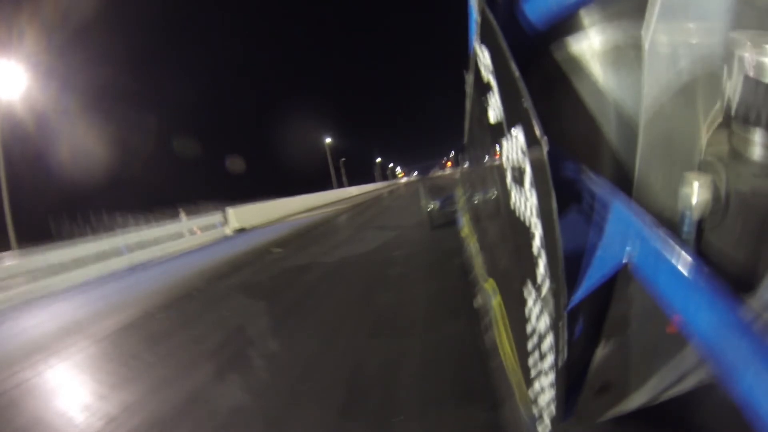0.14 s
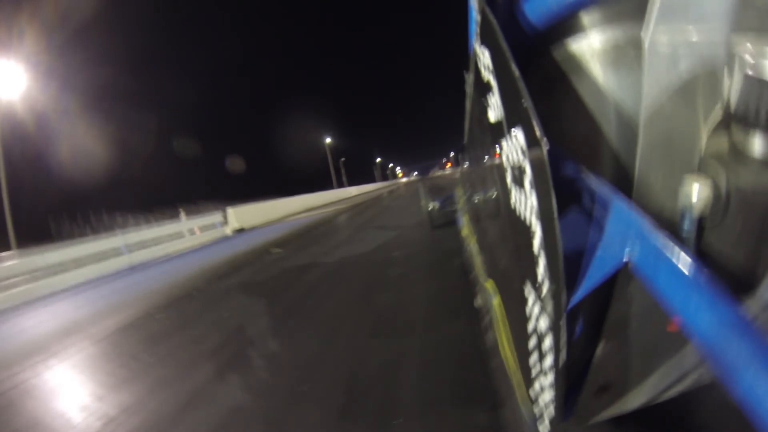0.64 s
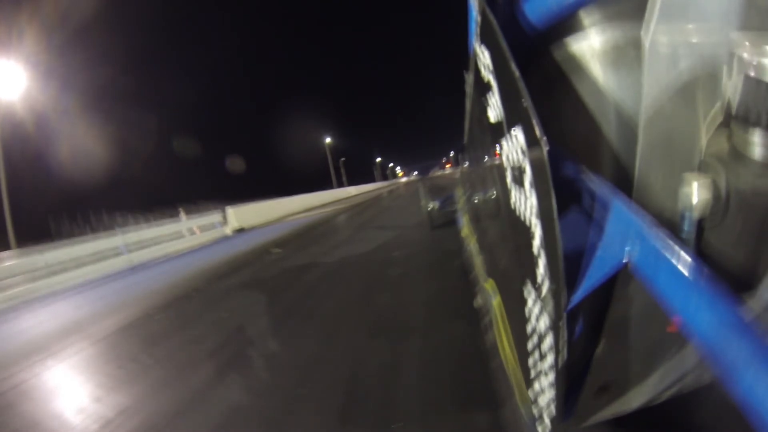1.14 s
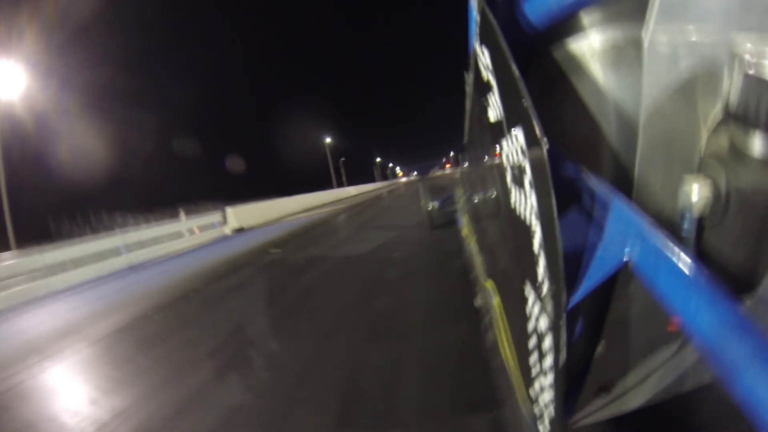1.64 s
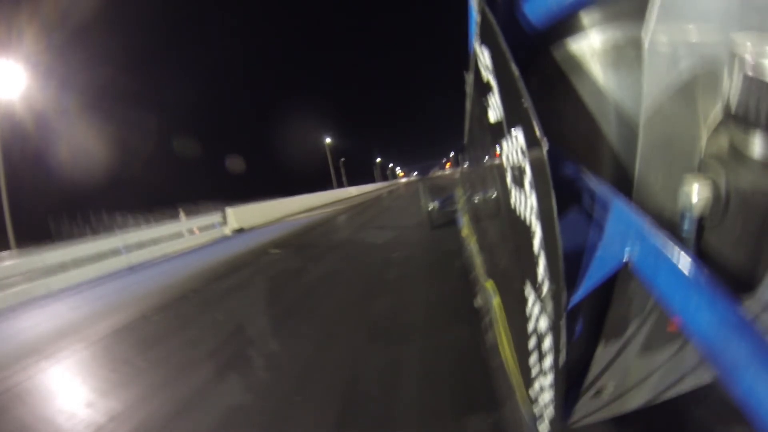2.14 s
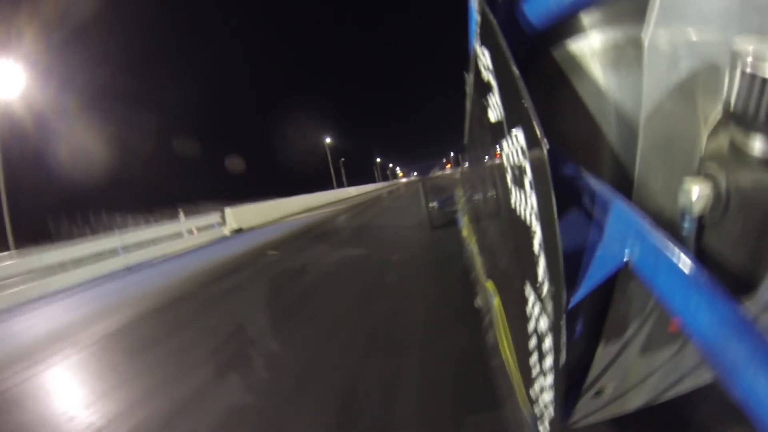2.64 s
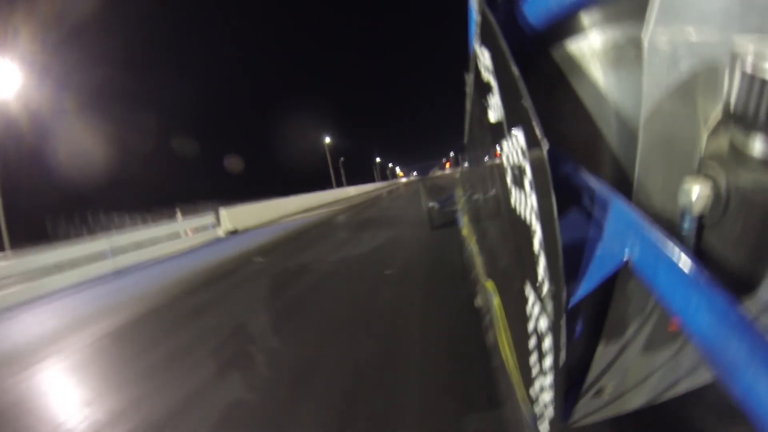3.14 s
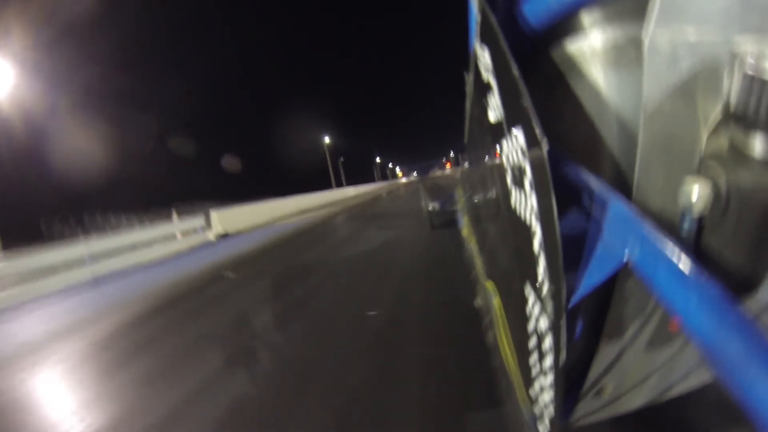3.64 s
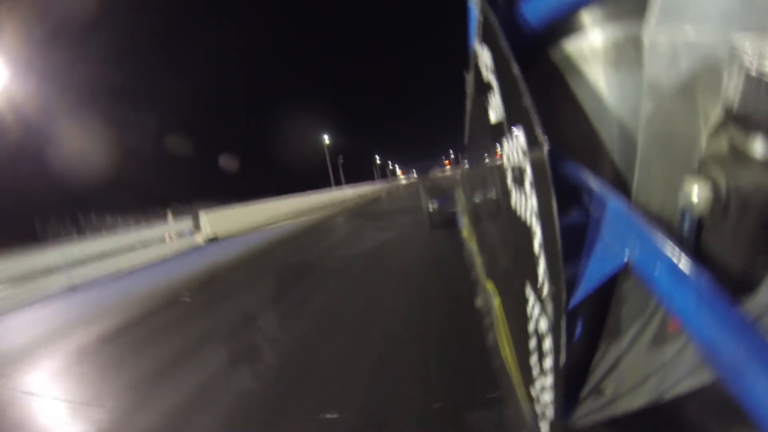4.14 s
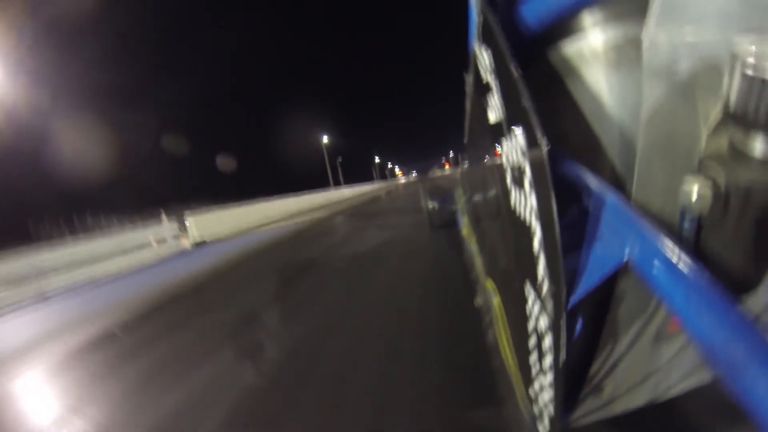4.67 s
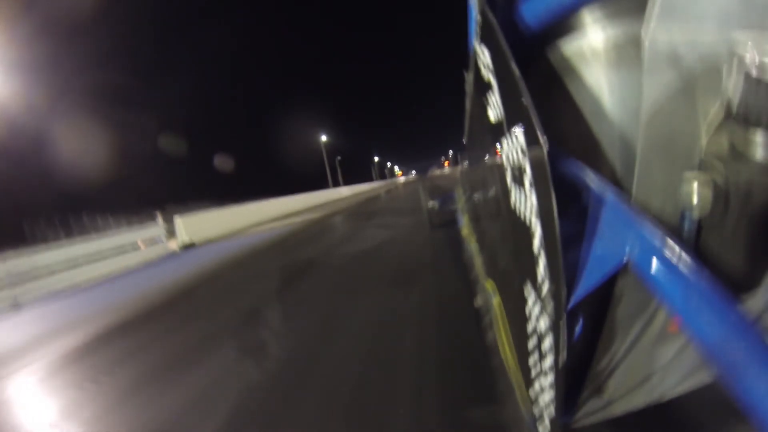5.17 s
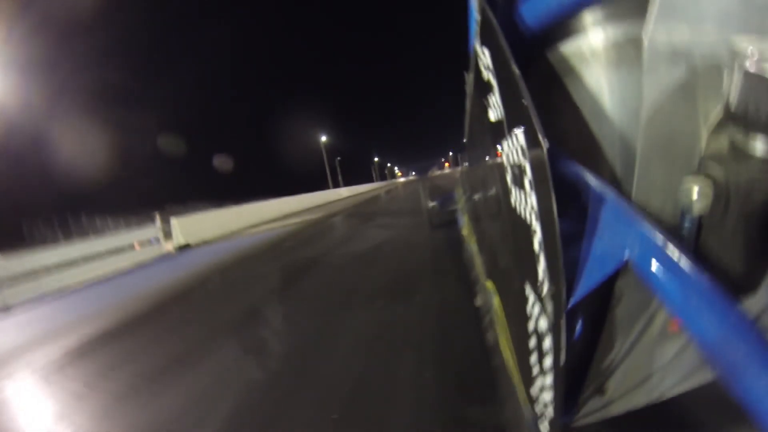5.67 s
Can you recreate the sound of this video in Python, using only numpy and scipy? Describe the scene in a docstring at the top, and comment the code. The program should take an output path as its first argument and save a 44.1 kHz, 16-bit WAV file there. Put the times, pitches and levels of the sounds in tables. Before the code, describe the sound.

Steady idle from start to end: a strong low hum near sixty hertz, dull firing thuds around sixteen a second, and a loose, hollow metallic rattle that swells and eases. Bodywork knocks land unevenly, a few bright ticks stand out, and a near-subsonic wobble grows after three seconds. Very close, dry, mono, slightly rounded on peaks, with no echo from the strip.

```python
"""A steady idling thrum with knocks, clatter and thin metal ticks over a slow low bounce and rumble.
A small single-cylinder four-stroke racing engine idles, heard by a microphone bolted to its car's frame.
The piston shakes the frame at twice crank speed and each firing rings the frame's low modes; valve gear and
loose bodywork strike the panels at set crank angles; the rolling chassis bounces and rumbles below."""
import sys
import numpy as np
from scipy import signal
from scipy.fft import rfft, irfft
from scipy.io import wavfile
from scipy.ndimage import uniform_filter1d

SR = 44100
rng = np.random.default_rng(int(sys.argv[2]) if len(sys.argv) > 2 else 0)


def dump(signal):
    """Clip the signal to [-1, 1] and save it as 16-bit WAV at the path in sys.argv[1]."""
    limited = np.clip(np.atleast_2d(signal).T, -1, 1)
    pcm = np.round(limited * 32767).astype(np.int16)
    wavfile.write(sys.argv[1], SR, pcm)


def voltage_ratio(level):
    """Linear amplitude factor for a level in decibels (scalar or array-like)."""
    return 10 ** (np.asarray(level, float) / 20)


N = 255339

# valve gear and bodywork contacts in the 720 degree cycle: angle/deg, clatter level/dB, tick level/dB
CONTACTS = [(15, -3, -5), (55, 0, 0), (95, -4, 0), (180, -8, -4), (222, -3, -5), (272, -7, -3),
            (378, -2, -3), (420, -9, -8), (458, -8, -3), (500, -5, -9), (550, -7, -3), (583, 0, -1),
            (628, -4, -1), (690, -4, -10)]
CONTACT_JITTER_MS = 0.6   # standard deviation: slack in the contact timing


def rms_one(x):
    """Scale to unit rms."""
    return x / np.sqrt(np.mean(x ** 2) + 1e-20)


def in_time(rows):
    """Columns of a curve table, interpolated at every sample."""
    s, *columns = np.transpose(rows)
    return [np.interp(np.arange(N) / SR, s, c) for c in columns]


def coloured(x, points):
    """Filter x by a (Hz, dB) gain curve, linear over log frequency."""
    hz = np.maximum(np.arange(N // 2 + 1) * SR / N, 1)
    point_hz, point_db = np.transpose(points)
    gain_db = np.interp(np.log(hz), np.log(point_hz), point_db)
    return irfft(rfft(x) * voltage_ratio(gain_db), N)


def poles(hz, r):
    """Denominator of a two-pole resonator."""
    return [1, -2 * r * np.cos(2 * np.pi * hz / SR), r * r]


def scatter(cycles, count):
    """Chance per cycle and contact: timing, and a strength that drifts as the part tightens or loosens."""
    timing, size, slack = rng.standard_normal((3, int(cycles[-1]) + 1, count))
    slack = 3 * uniform_filter1d(slack, size=9, axis=0)
    common = 0.72 * rng.standard_normal((len(size), 1))   # shared by all contacts of one cycle
    return timing, np.clip(size + 0.6 * slack + common, -3, 1.5)


def each_cycle(cycles, deg, db, luck, spread_db, jitter_ms):
    """One click per cycle and angle, scattered in time and strength."""
    timing, size = luck
    turns = np.arange(len(size))[:, None] + np.asarray(deg) / 720
    at = np.interp(turns, cycles, np.arange(N), left=-1e9, right=1e9)
    at = at + timing * jitter_ms * SR / 1000
    inside = (at >= 0) & (at < N)
    strength = voltage_ratio(np.asarray(db) + spread_db * size)
    out = np.zeros(N)
    np.add.at(out, at[inside].astype(int), strength[inside])
    return out


def typed(rows):
    """Clicks at listed moments."""
    out = np.zeros(N)
    out[[round(s * SR) for s, *_ in rows]] = voltage_ratio(np.array(rows)[:, 1])
    return out


def dying(clicks, ms):
    """Each click opens an exponentially falling envelope of time constant ms."""
    return signal.lfilter([1], [1, -np.exp(-1000 / (ms * SR))], clicks + 1e-18)


def panels(x):
    """Parallel panel resonances, signs alternating."""
    # panel modes: f/Hz, bandwidth/Hz, level/dB
    panel_modes = [(407, 74, -11.5), (558.3, 42.3, -1), (640, 116.6, -6.5), (842.8, 56.5, -1),
                   (979.5, 78.6, -5), (1216, 63.4, -1.5), (1313, 109, -3.5), (1591, 338, -14.5),
                   (2113, 224, -20.5), (2379, 117, -17.5), (2593, 43, -19), (2790, 165, -25),
                   (3630, 67, -38.5)]
    out = np.zeros(N)
    for k, (hz, width_hz, db) in enumerate(panel_modes):
        r = np.exp(-np.pi * width_hz / SR)
        numerator = [(1 - r * r) / 2, 0, (r * r - 1) / 2]
        out += (-1) ** k * voltage_ratio(db) * signal.lfilter(numerator, poles(hz, r), x)
    return out


def shake(cycles, rpm, bounce_db):
    """Piston inertia drives the frame at twice crank speed, with a lopsided overtone at four times."""
    # overtone level at or above the knee speed: t/s, level/dB
    overtone_curve = [(0, -36), (.35, -23.5), (1.2, -22.5), (2.3, -21), (3.6, -25.5), (4.4, -25),
                      (5.3, -22), (5.79, -24)]
    overtone_lead_turns, knee_rpm, fade_db_per_rpm = 0.33, 1881, 0.15
    # the shake grows as speed sags and yields while the chassis bounces; the overtone fades below the knee
    shake_db = -15 - 0.0315 * (rpm - 1880) - 2 * voltage_ratio(bounce_db - bounce_db.max())
    overtone_db = in_time(overtone_curve)[0] + fade_db_per_rpm * np.minimum(rpm - knee_rpm, 0)
    phase = 8 * np.pi * cycles   # two turns per crank turn, four per cycle
    overtone = np.cos(2 * phase + 2 * np.pi * overtone_lead_turns)
    return np.sqrt(2) * (voltage_ratio(shake_db) * np.cos(phase) + voltage_ratio(overtone_db) * overtone)


def firing(cycles):
    """Blows ring the low frame modes; the top mode follows the knock strength fully, the lowest least."""
    # pressure blows near the dead centres, firing then lighter rebound: angle/deg of 720, level/dB
    blows = [(19, 0), (386, -4)]
    # low frame modes: f/Hz, level/dB, t60/s, response to the rebound/dB
    frame_modes = [(79.24, -18, 0.22, -21), (103, -34.5, 0.12, -1), (141.7, -29, 0.37, -27),
                   (157.5, -24, 0.3, -7.5), (195.4, -33.5, 0.21, -12), (224, -27.5, 0.17, 2),
                   (248.8, -27.5, 0.17, 6), (286, -30, 0.25, 3.5), (316, -15, 0.13, -5),
                   (326, -33, 0.14, -23)]
    # knock strength, used relative to its mean: t/s, level/dB
    knock_curve = [(0, -27), (.5, -24), (1.4, -27), (1.85, -23), (2.7, -28), (4.3, -30), (5.4, -25),
                   (5.79, -33)]
    fire, rebound = (each_cycle(cycles, [deg], [db], scatter(cycles, count=1), spread_db=0.77, jitter_ms=0.11)
                     for deg, db in blows)
    # some charges burn harder than others
    burn = np.clip(rng.standard_normal(int(cycles[-1]) + 2), -2, 1.5)
    burn_db = 2.5 * burn[np.round(cycles).astype(int)]
    knock_db, = in_time(knock_curve)
    strength_db = knock_db - np.mean(knock_db) + burn_db
    top_hz = frame_modes[-1][0]
    out = np.zeros(N)
    for hz, level_db, t60_s, rebound_db in frame_modes:
        struck = (fire + voltage_ratio(rebound_db) * rebound) * voltage_ratio(level_db + strength_db * hz / top_hz)
        ring = [0, np.sin(2 * np.pi * hz / SR)]
        out += signal.lfilter(ring, poles(hz, voltage_ratio(-60 / (t60_s * SR))), struck + 1e-18)
    # gas pressure builds over a millisecond, and a stiff frame passes little below its first mode
    soft = np.exp(-2 * np.pi * 450 / SR)
    out = signal.lfilter([(1 - soft) ** 2], [1, -2 * soft, soft ** 2], out)
    return signal.sosfilt(signal.butter(2, 55, "high", fs=SR, output="sos"), out)


def clatter(cycles, luck, clatter_db):
    """Each contact is a firm tap plus a burst of chatter over a constant buzz, heard through the panels."""
    deg, db, _ = np.transpose(CONTACTS)
    taps = each_cycle(cycles, deg, db, luck, spread_db=4.0, jitter_ms=CONTACT_JITTER_MS)
    chatter = (dying(taps, ms=2.0) + voltage_ratio(-2.5)) * rng.standard_normal(N)
    return voltage_ratio(clatter_db) * rms_one(panels(voltage_ratio(12.0) * taps + chatter))


def bodywork_knocks():
    """Harder knocks of the bodywork: a click and a noise burst into the panels."""
    # strikes, ahead of panels and gain: t/s, relative level/dB
    strikes = [(0.064, 2), (0.508, -3), (0.705, -9), (1.027, 1), (1.139, -1), (1.356, -4), (1.911, -0.5),
               (2.103, 4), (2.402, -7), (2.591, 4), (2.878, 5), (3.18, -7), (3.451, -28), (3.835, -13),
               (3.998, 4), (4.467, 1), (4.639, 1), (4.984, -3.5), (5.088, -4.5), (5.251, -5), (5.429, 2.5),
               (5.572, 2)]
    clicks = typed(strikes)
    bursts = voltage_ratio(-13.5) * dying(clicks, ms=1.7) * rng.standard_normal(N)
    return voltage_ratio(21) * panels(clicks + bursts)


def ticks(cycles, luck, clatter_db):
    """The contacts give thin ticks over a faint hiss; no two strike the small parts alike, so colour varies."""
    # tick spectrum: f/Hz, relative density/dB per Hz
    tick_colour = [(2600, -15.5), (3300, 5), (3600, 4.5), (4200, -0.5), (4800, -0.5), (5080, 3.5),
                   (5600, -6.5), (6500, -4.5), (7500, -9), (9000, -14), (11000, -13), (13000, -14),
                   (14000, -22), (15300, -39)]
    deg, _, db = np.transpose(CONTACTS)
    timing, size = luck
    noise = rfft(coloured(rng.standard_normal(N), tick_colour))
    octave = np.log2(np.arange(1, len(noise) + 1) * SR / N / 3000)
    place = np.clip(octave / 0.6, 0, 4)   # five crossfaded bands, 0.6 octave apart
    train = np.zeros(N)
    for band in range(5):
        tinted = timing, size + 0.65 * np.clip(rng.standard_normal(size.shape), -2, 2)
        clicks = each_cycle(cycles, deg, db, tinted, spread_db=2.5, jitter_ms=CONTACT_JITTER_MS)
        share = np.cos(np.pi / 2 * np.clip(place - band, -1, 1)) ** 2
        train += (dying(clicks, ms=2.5) + voltage_ratio(-19.5)) * irfft(noise * share, N)
    tick_db = -51 + 0.61 * (clatter_db - clatter_db.mean())   # follows part of the clatter's swing
    return voltage_ratio(tick_db) * rms_one(train)


def pings():
    """Lone sharp ticks: a broad crack and a short ring of the part that was hit."""
    # sharp metal ticks: t/s, relative level/dB, ring f/Hz
    sharp_ticks = [(0.0638, -25, 4720), (0.4334, -38, 4140), (0.625, -31, 4050), (0.867, -27, 4030),
                   (1.5279, -31.5, 4330), (2.1655, -34, 4260), (2.8644, -32, 4840), (3.1348, -30, 5300),
                   (3.3613, -33, 4220), (4.0073, -29, 4310), (4.369, -31, 4150), (4.531, -29, 5050),
                   (4.793, -19.5, 4610), (5.0245, -28, 4980), (5.4266, -36, 4690)]
    band = signal.butter(2, [3800, 13000], "band", fs=SR, output="sos")
    bright = signal.sosfilt(band, rng.standard_normal(N))
    out = voltage_ratio(-13.0) * dying(typed(sharp_ticks), ms=1.6) * bright
    age_s = np.arange(600) / SR
    for s, db, hz in sharp_ticks:
        at = round(s * SR)
        ring = np.exp(-age_s / 0.0018) * np.sin(2 * np.pi * hz * age_s)
        out[at:at + len(age_s)] += voltage_ratio(db - 10.5) * ring
    return out


def chassis_bounce(bounce_db):
    """A sine near the bottom of hearing, its pitch wandering as the chassis bounces."""
    centre_hz, wander_hz = 22.2, 1
    wander = np.interp(np.arange(N) / SR, np.linspace(0, N / SR, 40), rng.standard_normal(40))
    hz = centre_hz + wander_hz * wander
    return np.sqrt(2) * voltage_ratio(bounce_db) * np.sin(2 * np.pi * np.cumsum(hz) / SR)


def road():
    """Road and tyre rumble through the frame: shaped noise at constant level."""
    # rumble spectrum: f/Hz, relative density/dB per Hz
    road_colour = [(12, -27), (30, -5), (42, -16), (65, 2.5), (105, -7), (150, -3.5), (220, -5), (320, -7),
                   (480, -21.5), (700, -91)]
    return voltage_ratio(-26) * rms_one(coloured(rng.standard_normal(N), road_colour))


def scene():
    """All sources reach one microphone through the frame."""
    # crank speed: t/s, speed/rpm
    speed_curve = [(0.0, 1864.4), (0.59, 1882.4), (1.34, 1843.5), (1.59, 1888.2), (2.18, 1868.8),
                   (2.43, 1917.0), (2.69, 1875.7), (3.19, 1904.1), (3.27, 1862.7), (3.36, 1899.5),
                   (3.86, 1874.1), (4.11, 1898.2), (4.62, 1906.1), (4.87, 1827.0), (4.95, 1894.8),
                   (5.2, 1861.7), (5.29, 1905.1), (5.37, 1808.3), (5.62, 1907.8), (5.79, 1856.3)]
    # clatter level: t/s, level/dB
    clatter_curve = [(0, -21.5), (.5, -20.5), (1.3, -22), (1.65, -18.5), (2.0, -21.5), (2.45, -18),
                     (2.75, -22), (3.15, -21.5), (3.5, -20), (3.85, -22), (4.05, -20), (4.35, -22.5),
                     (4.65, -19.5), (4.85, -22), (5.6, -19), (5.79, -21.5)]
    # chassis bounce level ahead of its surges: t/s, level/dB
    bounce_curve = [(0, -38), (.7, -42), (.9, -35), (1.25, -44), (2.0, -35), (2.4, -40), (3.0, -30),
                    (3.5, -22), (3.8, -27), (4.15, -20.5), (4.4, -27), (5.2, -25), (5.6, -44), (5.79, -38)]
    start_deg, surge_hz, surge_db, surge_peak_s = 26.5, 2.83, 1, 3.47
    (rpm,), (clatter_db,), (bounce_db,) = map(in_time, (speed_curve, clatter_curve, bounce_curve))
    since_peak_s = np.arange(N) / SR - surge_peak_s
    bounce_db = bounce_db + surge_db * np.cos(2 * np.pi * surge_hz * since_peak_s)
    cycles = start_deg / 720 + np.cumsum(rpm) / (120 * SR)   # one cycle is two crank turns
    luck = scatter(cycles, count=len(CONTACTS))
    engine = shake(cycles, rpm, bounce_db) + firing(cycles)
    contacts = clatter(cycles, luck, clatter_db) + bodywork_knocks() + ticks(cycles, luck, clatter_db)
    return (engine + contacts + pings() + chassis_bounce(bounce_db) + road())[None]


def band_limit(x):
    """A steep low-pass at the top of the band."""
    return signal.sosfilt(signal.butter(12, 15300, fs=SR, output="sos"), x)


def record(dry):
    """The input rounds the peaks and dulls the very top."""
    rounded = 1.294 * np.tanh(dry / 1.268)
    dull = signal.sosfilt(signal.butter(4, 14000, fs=SR, output="sos"), rounded)
    return band_limit(dull)


dry = scene()
out = record(dry)
dump(out)
```